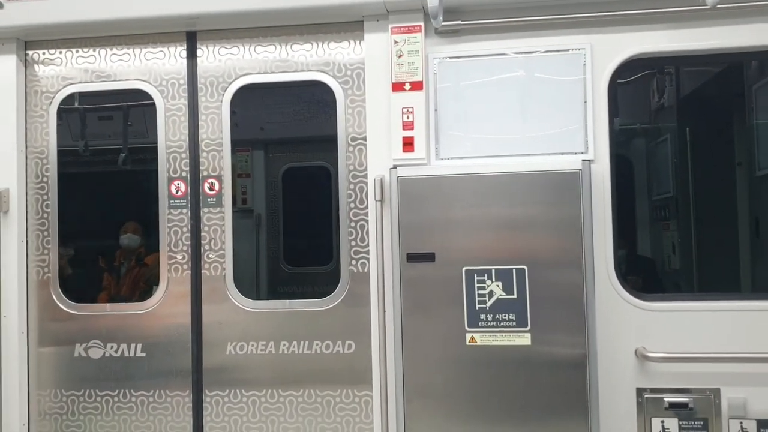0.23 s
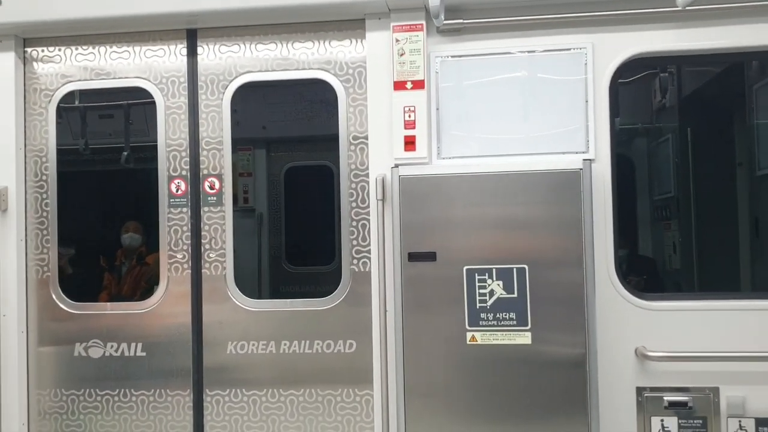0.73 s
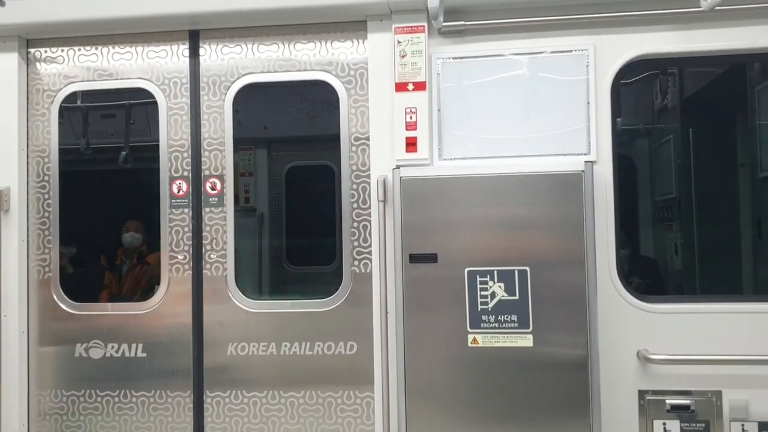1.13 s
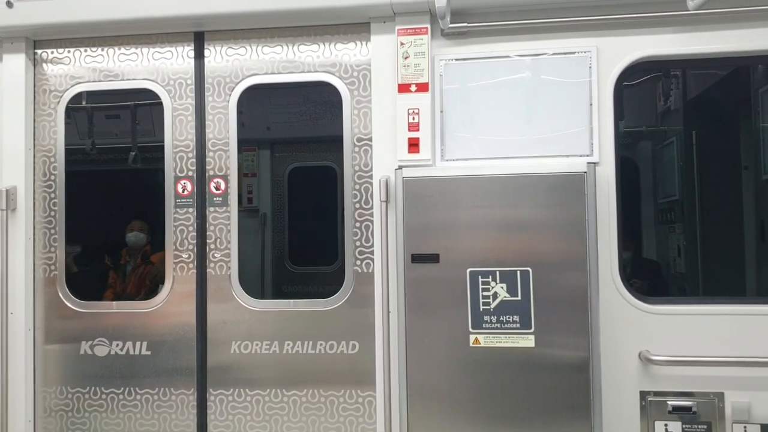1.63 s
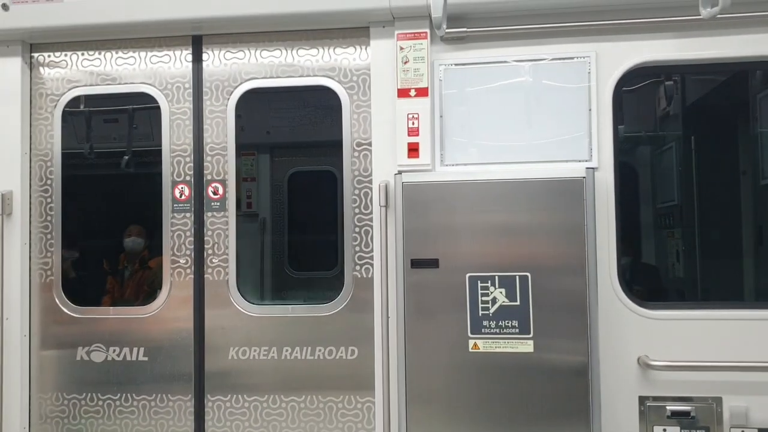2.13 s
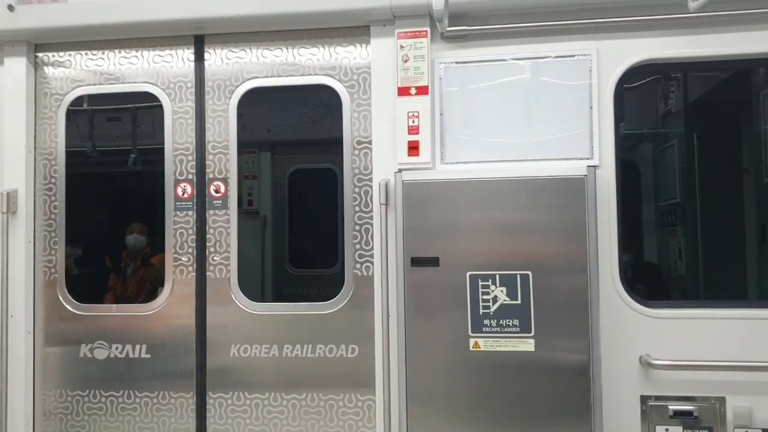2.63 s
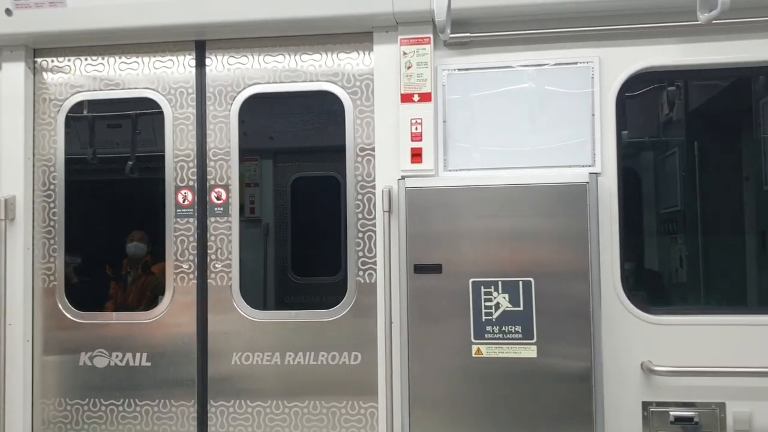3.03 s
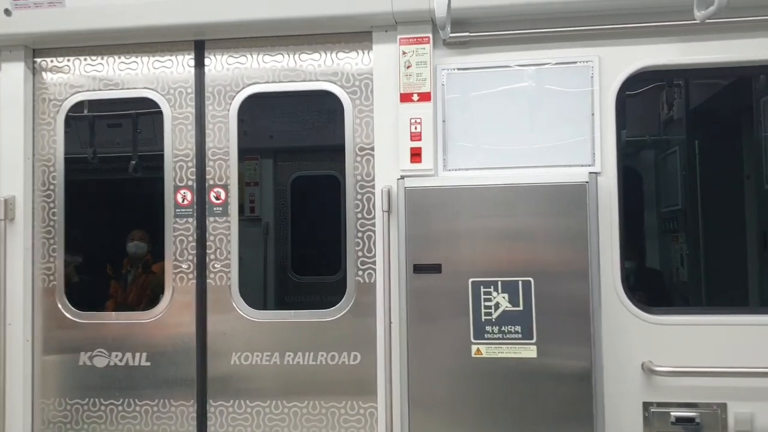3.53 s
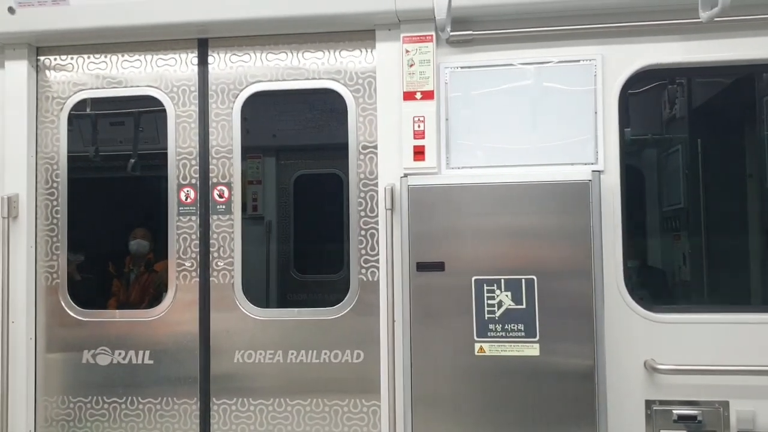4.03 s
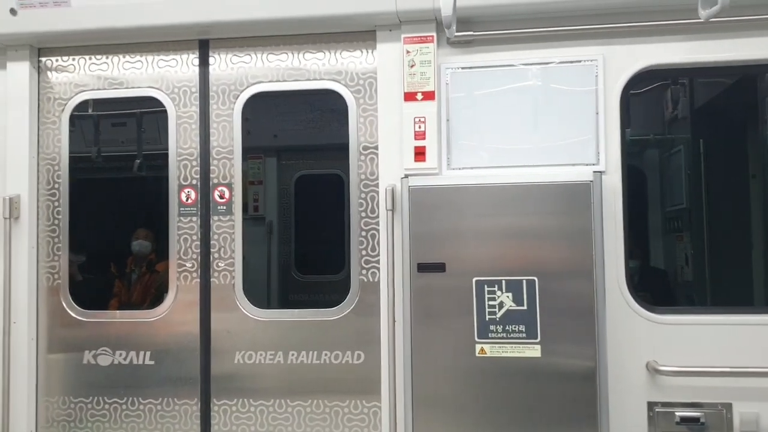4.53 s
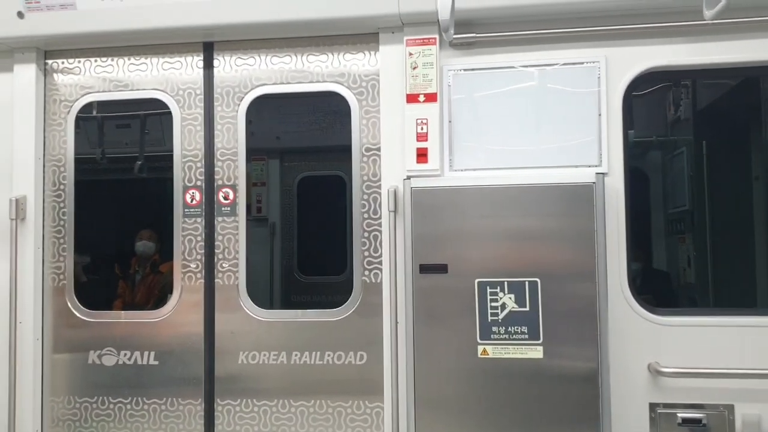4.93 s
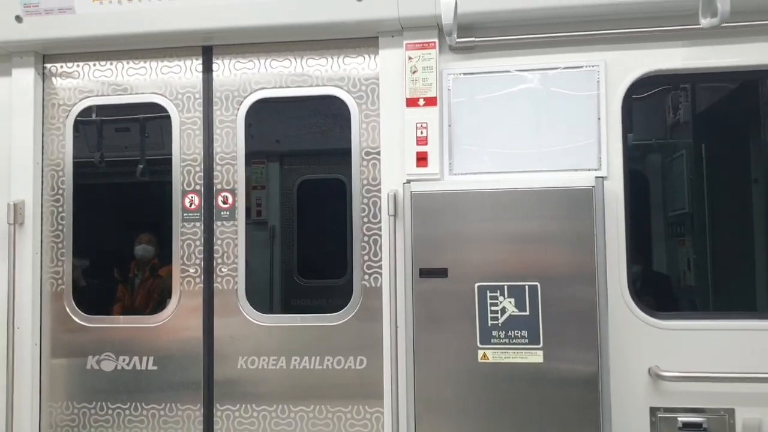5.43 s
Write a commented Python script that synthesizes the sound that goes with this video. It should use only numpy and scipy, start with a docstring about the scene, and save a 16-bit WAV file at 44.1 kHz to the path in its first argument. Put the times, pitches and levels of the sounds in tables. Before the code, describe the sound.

A train interior with bass-heavy rolling noise. Rail-joint knocks strike at the start, just before one second, after one and near one and a half, with small rattles, dry ticks and a tiny very high squeak. Afterwards mostly rumble, surging low booms and wavering rail howl, with breathy gusts of air. Close, enclosed space; small wide stereo microphone, treble softened, no people heard.

```python
"""Wheels roar on the rails at the end of an electric subway carriage running through a tunnel.
Shaped noise makes the roar, rumble, drone and howl; the body shell booms as a wandering low tone.
Rail joints knock under the floor with fading tones and noise bursts, and the trim ticks.
Hiss makes the air at the door seals; steady high tones make a squeaking fitting and faint inverter whines."""
import sys
import numpy as np
from scipy import signal
from scipy.fft import rfft, irfft, next_fast_len
from scipy.io import wavfile
from scipy.ndimage import uniform_filter1d

SR = 44100
rng = np.random.default_rng(int(sys.argv[2]) if len(sys.argv) > 2 else 0)


def master_out(mix):
    """Clip the mix to full scale and print it as 16-bit PCM to the path in sys.argv[1]."""
    frames = np.transpose(np.atleast_2d(mix))
    ceiling = np.clip(frames, -1, 1)
    pcm = np.round(ceiling * 32767).astype(np.int16)
    wavfile.write(sys.argv[1], SR, pcm)


N = 250488  # length in samples

# How loud the wheels are on the rails. Each row: time in seconds, roar off the tunnel wall in dB,
# drone of the rail in dB, rumble through the floor in dB.
ROLLING_LEVELS = [(0, -44, -39.5, -27.5), (.4, -43, -44.5, -26.5), (.53, -44, -39.5, -29),
                  (.7, -44.5, -43, -27), (.84, -43.5, -35.5, -29), (.95, -43.5, -42.5, -26),
                  (1.15, -41, -35.5, -27), (1.33, -45.5, -42, -30), (1.65, -44.5, -42, -27.5),
                  (1.9, -42.5, -39, -27), (2.1, -44, -46, -26), (2.42, -46.5, -46, -28.5),
                  (2.92, -41.5, -39.5, -25), (3.09, -40, -37.5, -28), (3.22, -43, -41.5, -27),
                  (3.4, -46, -43.5, -29.5), (3.72, -44, -40, -28), (3.89, -41.5, -37.5, -28),
                  (4.1, -45, -38.5, -28), (4.24, -40, -37.5, -26), (4.45, -47.5, -45, -29.5),
                  (4.75, -44.5, -40.5, -28), (4.88, -43, -36.5, -27), (5.02, -45, -42, -29),
                  (5.13, -44, -36.5, -28.5), (5.35, -46.5, -45, -28.5), (5.68, -42.5, -39.5, -30)]
# Tone colours of the three noises; cabin modes make the humps in the rumble.
# Each row: frequency in Hz, strength in dB per Hz.
ROAR_COLOUR = [(900, -21.5), (1300, -4), (1600, -1.5), (1800, -4), (2200, -1.5), (2800, -6), (3000, -13),
               (3900, -18.5), (4200, -19), (5000, -26), (7500, -29), (8600, -54), (11300, -36.5),
               (14700, -40.5)]
DRONE_COLOUR = [(450, -30), (560, -5), (700, -5), (820, -7), (1000, -13.5), (1400, -33)]
RUMBLE_COLOUR = [(25, -31), (38, -18.5), (48, -11), (65, 1), (85, -5), (105, -15.5), (180, -21.5),
                 (205, -13), (225, -10), (240, -12), (300, -13), (340, -9), (400, -14.5), (470, -11),
                 (575, -24), (700, -21.5), (900, -29.5), (1200, -48.5)]


def rolling():
    """Wheel and rail roughness shakes the tunnel air, the rail and the floor."""
    roar_db, drone_db, rumble_db = curves(ROLLING_LEVELS)
    roar = gain_of(roar_db) * noise(ROAR_COLOUR, patchy_db=1.0)
    drone = gain_of(drone_db) * noise(DRONE_COLOUR, patchy_db=1.0)
    rumble = gain_of(rumble_db) * noise(RUMBLE_COLOUR, patchy_db=0.2, size=4096)
    return roar + drone + rumble


# Loudness of the rail's upper band. Each row: time in seconds, level in dB.
HOWL_LEVELS = [(0.0, -45.5), (0.7, -46), (1.03, -46.5), (1.34, -49), (1.93, -46), (2.29, -49),
               (2.53, -46.5), (2.94, -41), (3.32, -51), (3.51, -44.5), (3.83, -42.5), (4.06, -41.5),
               (4.4, -46.5), (4.98, -44), (5.31, -48.5), (5.68, -45)]
# Its tone colour. Each row: frequency in Hz, strength in dB per Hz.
HOWL_COLOUR = [(750, -24.5), (900, -3.5), (1100, -3.5), (1400, -7.5), (1900, -29.5)]


def howl():
    """The upper band of the rail's drone swells on its own."""
    return gain_of(curves(HOWL_LEVELS)[0]) * noise(HOWL_COLOUR, patchy_db=1.0)


# Loudness of the deep thrum under the floor. Each row: time in seconds, level in dB.
THRUM_LEVELS = [(0, -29), (.2, -26.5), (.71, -25.5), (.87, -24), (.97, -30), (1.15, -27), (1.75, -30),
                (1.9, -29), (2.85, -28), (3.03, -23), (3.14, -28.5), (3.25, -23), (3.5, -30.5),
                (3.85, -26.5), (4.1, -30), (4.24, -27.5), (4.6, -28.5), (4.9, -26), (5.06, -27), (5.3, -27),
                (5.68, -31)]
# Its tone colour. Each row: frequency in Hz, strength in dB per Hz.
THRUM_COLOUR = [(85, -10), (105, -4.5), (115, -4.5), (125, 0), (143, -3.5), (160, -1.5), (185, -4),
                (210, -16.5)]


def thrum():
    """The deep resonances of the cabin come and go with the track."""
    return gain_of(curves(THRUM_LEVELS)[0]) * noise(THRUM_COLOUR, patchy_db=-0.25, size=4096)


# Jolts of the body shell, each one swell.
# Each row: start in seconds, length in seconds, level in dB, pitch in Hz.
SHELL_JOLTS = [(0.043, 0.13, -20, 54), (0.215, 0.092, -20, 59.2), (0.291, 0.059, -23, 55.7),
               (0.37, 0.092, -23, 56.3), (0.477, 0.07, -19, 58.6), (0.601, 0.063, -23, 57.4),
               (0.715, 0.12, -24.5, 54.5), (.84, .1, -23, 52.8), (0.92, .21, -19.5, 52.6),
               (1.208, 0.32, -23.5, 57.3), (1.543, 0.11, -23.5, 62.5), (1.639, 0.14, -21, 51.4),
               (1.97, 0.11, -22, 58.2), (2.098, .1, -32.5, 63), (2.779, 0.11, -23.5, 56),
               (2.99, .12, -18.5, 51.8), (3.08, .13, -17.5, 50.6), (3.204, 0.1, -19, 53.3),
               (3.273, 0.18, -19, 52.9), (3.42, .1, -24, 54.3), (3.799, 0.27, -29.5, 58.2),
               (4.113, 0.16, -15, 52.8), (4.238, 0.12, -18.5, 50.7), (4.368, 0.13, -26, 53.5),
               (4.92, 0.13, -23, 55.3)]
# Loudness of the shell's murmur. Each row: time in seconds, level in dB.
MURMUR_LEVELS = [(0, -29.5), (1.2, -34), (2.3, -28), (2.9, -30.5), (3.7, -33), (4.7, -44.5), (5.3, -33),
                 (5.68, -41.5)]
JOLT_RISE, JOLT_FALL = 0.37, 0.36  # shares of the jolt's length
JOLT_ROUGH_DB = 0.9  # a swell never holds still
MURMUR_HZ, MURMUR_WIDTH_HZ = 53.5, 7.62  # the mode wanders by chance between jolts


def boom():
    """The shell's lowest mode murmurs; each jolt takes it over in one swell, the same in both ports."""
    swells = np.array([swell(s, length, JOLT_RISE, JOLT_FALL) for s, length, db, hz in SHELL_JOLTS])
    _, _, db, hz = np.transpose(SHELL_JOLTS)
    power = (gain_of(db)[:, None] * swells) ** 2
    level = np.sqrt(power.sum(axis=0))
    # the strongest jolt pulls the pitch most; with no jolt the tiny term leads back to the murmur
    pitch = (hz @ power + MURMUR_HZ * 1e-9) / (level ** 2 + 1e-9)
    jolts = level * np.sqrt(2) * np.sin(2 * np.pi * np.cumsum(pitch) / SR)
    jolts = jolts * uneven(JOLT_ROUGH_DB, size=2000)
    murmur = gain_of(curves(MURMUR_LEVELS)[0]) * wavering(MURMUR_HZ, MURMUR_WIDTH_HZ)[0]
    return jolts + (1 - swells.max(axis=0)) * murmur


# Blows at the rail joints. Each row: start in seconds, ring of the floor in dB, ring of the wheel in dB,
# clack in dB, bite in dB, rattle of loose trim in dB,
# time in seconds for clack, bite and rattle to fade by 60 dB.
JOINT_KNOCKS = [(0.033, -36, -50, -53, -57, -75, .2), (0.2118, -18, -17.5, -28, -38.5, -76, 0.21),
                (0.2314, -25, -31, -41, -43, -79, 0.25), (.476, -45, -50, -48, -52, -67, .17),
                (0.506, -57, -48, -38, -47, -58, 0.22), (0.786, -32.5, -26, -35, -52, -74, 0.2),
                (.805, -36, -32, -37, -44, -56, 0.33), (.818, -48, -30, -34, -47, -58, .15),
                (0.831, -45, -30, -38, -46, -54, 0.27), (0.842, -22, -32, -41, -48, -62, .2),
                (0.864, -33, -33, -47, -54, -68, .15), (1.181, -26.5, -27, -34, -36.5, -42.5, 0.34),
                (1.186, -40, -28.5, -40, -36, -58, 0.15), (1.198, -32, -33, -36, -50, -68, 0.47),
                (1.219, -29, -37, -45, -46, -60, 0.22), (1.24, -48, -41, -46, -48, -62, .2),
                (1.315, -47, -50, -55, -56, -50.5, 0.31), (1.318, -52, -48, -52, -42, -55, 0.15),
                (1.5455, -34, -21.5, -27.5, -42, -70, 0.18), (1.554, -26, -21, -33, -42, -69, 0.17),
                (1.569, -30, -33, -39, -49, -74, 0.27), (1.765, -37, -38, -47, -48, -63, .1),
                (2.69, -45, -34, -48, -48, -67, 0.11), (3.758, -48, -39, -50, -59, -75, 0.18),
                (3.855, -44, -40, -39, -52, -79, 0.11), (3.997, -26.5, -53, -34, -63, -77, .15),
                (5.565, -40, -42, -51, -49, -66, .09)]
# Rise times in seconds of clack, bite and rattle, one a row: the treble arrives first.
KNOCK_RISE_S = [
    [0.0082],
    [0.0069],
    [0.0015],
]
# Tone colours of the three noises. Each row: frequency in Hz, strength in dB per Hz.
CLACK_COLOUR = [(700, -17), (1000, 2.5), (1450, 4), (1900, -2), (2500, -3), (3000, -3.5), (3400, -20)]
BITE_COLOUR = [(2400, -16), (3000, 3.5), (3600, -0.5), (4300, 1), (4900, -10.5), (7500, -15.5), (8300, -47)]
RATTLE_COLOUR = [(3500, -10), (5000, 5), (7500, 0), (9000, -5.5), (12000, -5), (14700, -11)]
# Modes (natural tones) of the floor and of the wheel, whose low ones swell late.
# Each row: frequency in Hz, strength in dB, time in seconds to fade by 60 dB, rise time in seconds.
FLOOR_MODES = [(366, 0.5, 0.13, 0.002), (414, 5.5, 0.05, 0.0017), (500, 5, 0.053, 0.0031),
               (664, 2.5, 0.036, 0.0022), (1127, -27.5, 0.041, 0.0046)]
WHEEL_MODES = [(1366, -18.5, 0.058, 0.023), (1576, -5.5, 0.066, 0.0097), (1814, -13.5, 0.057, 0.0097),
               (2100, -11, 0.031, 0.0038), (2446, -8, .045, .004), (2810, -3.5, 0.018, 0.0024),
               (3072, -14, 0.021, 0.0026), (3720, -20, 0.025, .003), (4280, -25, 0.032, 0.0054),
               (4400, -24.5, .03, .003)]
CHATTER_DB = 1.6  # parts strike unevenly


def knocks():
    """Each joint rings floor and wheel in fading tones, clacks and shakes the trim in noise bursts."""
    colours = (CLACK_COLOUR, BITE_COLOUR, RATTLE_COLOUR)
    noises = [noise(colour, patchy_db=0.5, size=512) for colour in colours]
    chatter = uneven(CHATTER_DB, size=60)
    t = np.arange(N) / SR
    power, rings = np.zeros((3, N)), np.zeros(N)
    for s, floor_db, wheel_db, clack_db, bite_db, rattle_db, t60 in JOINT_KNOCKS:
        age = np.maximum(t - s, 0)
        shape = (1 - np.exp(-age / KNOCK_RISE_S)) * gain_of(-60 * age / t60)
        # the direct sound leads, most in the rattle
        snap = 1 + np.array([[.3], [.2], [.8]]) * np.exp(-age / 0.0044)
        power += (gain_of([[clack_db], [bite_db], [rattle_db]]) * shape * snap) ** 2
        floor_ring = gain_of(floor_db) * ringing(FLOOR_MODES)
        wheel_ring = gain_of(wheel_db) * ringing(WHEEL_MODES)
        add(rings, s, floor_ring + wheel_ring)
    bursts = sum(np.sqrt(p) * part for p, part in zip(power, noises))
    return rings + chatter * bursts


# Thin ticks of the trim. Each row: start in seconds, level in dB.
TRIM_TICKS = [(1.180, -56), (1.313, -47), (2.902, -51)]
# Their tone colour. Each row: frequency in Hz, strength in dB per Hz.
TICK_COLOUR = [(5000, -22), (8000, -10), (11000, -1), (13000, 0), (14700, -2)]
TICK_T60_S = 0.033  # seconds to fade by 60 dB


def ticks():
    """The trim gives a few dry, very high ticks: noise that starts at once and fades fast."""
    t = np.arange(N) / SR
    level = sum((t >= s) * gain_of(db - 60 * np.maximum(t - s, 0) / TICK_T60_S) for s, db in TRIM_TICKS)
    return level * noise(TICK_COLOUR, patchy_db=0, size=512)


# Gusts at the door seals. Each row: start in seconds, length in seconds, level in dB.
SEAL_GUSTS = [(0.01, 0.17, -83), (0.31, 0.48, -54.5), (.76, 0.23, -48), (1.093, 0.27, -57),
              (1.398, 0.22, -59), (2.348, 0.49, -64), (2.814, 0.29, -51), (2.966, 0.29, -49),
              (3.165, 0.24, -59.5), (4.074, 0.35, -50.5), (4.898, 0.17, -67)]
# The leak that goes on beneath the gusts. Each row: time in seconds, level in dB.
LEAK_LEVELS = [(0, -62.5), (1.0, -58.5), (1.7, -70), (2.1, -65.5), (2.7, -66), (3.62, -61), (3.75, -71),
               (4.0, -62), (4.8, -71), (5.68, -65)]
# Tone colour of the hiss. Each row: frequency in Hz, strength in dB per Hz.
RUSH_COLOUR = [(2000, -6), (3000, -1), (4500, -5), (6000, -12), (7500, -9), (8800, -23), (10000, -13),
               (11500, -11), (12800, -20), (14700, -26)]
GUST_RISE, GUST_FALL = 0.25, 0.67  # shares of the gust's length
FLUTTER_DB = 1.1  # the seals flutter and coarsen the hiss


def rush():
    """Tunnel air hisses through the fluttering door seals, as a leak with gusts."""
    gusts = sum((gain_of(db) * swell(s, length, GUST_RISE, GUST_FALL)) ** 2 for s, length, db in SEAL_GUSTS)
    leak = gain_of(curves(LEAK_LEVELS)[0]) ** 2
    level = np.sqrt(gusts + leak) * uneven(FLUTTER_DB, size=300)
    return level * noise(RUSH_COLOUR, patchy_db=3.0, size=512)


# Rubs of the fitting. Each row: start in seconds, length in seconds, level in the right port in dB.
FITTING_SQUEAKS = [(.035, 0.065, -63), (0.62, 0.073, -53.5), (1.315, 0.052, -42.5), (1.43, 0.055, -62)]
SQUEAK_HZ, SQUEAK_WIDTH_HZ = 10395, 9.1
SQUEAK_RISE, SQUEAK_FALL = 0.17, 0.35  # shares of the squeak's length
SQUEAK_T60_S = 0.22  # tail in the carriage: seconds to fade by 60 dB
SQUEAK_LEFT_DB = -4  # left port against right


def squeaks():
    """A rubbing fitting sings on one high pitch for a moment, a little to the right."""
    rub = sum(gain_of(db) * swell(s, length, SQUEAK_RISE, SQUEAK_FALL) for s, length, db in FITTING_SQUEAKS)
    keep = gain_of(-60 / (SQUEAK_T60_S * SR))  # share kept from one sample to the next
    tail = signal.lfilter([1 - keep], [1, -keep], rub)
    level = np.maximum(rub, tail)
    return level * wavering(SQUEAK_HZ, SQUEAK_WIDTH_HZ) * gain_of([[SQUEAK_LEFT_DB], [0]])


# Pitches of the whines in Hz.
WHINE_HZ = [4135, 6501, 7499, 13001]
# One row for each pitch. Each row: level in dB, width of the line in Hz.
WHINE_LINES = [(-78, 26), (-79.5, 5.4), (-79.5, 16), (-84, 3.3)]
WHINE_FLICKER_DB = 2


def inverter():
    """The traction gear gives thin, steady-pitched whines that come and go in strength."""
    return sum(gain_of(db) * wavering(hz, width_hz) * uneven(WHINE_FLICKER_DB, size=4000)
               for hz, (db, width_hz) in zip(WHINE_HZ, WHINE_LINES))


def gain_of(db):
    """Turn decibels into a factor."""
    return 10 ** (np.asarray(db) / 20)


def evened(x):
    """Scale to an average (RMS) strength of 1."""
    return x / np.sqrt(np.mean(x ** 2) + 1e-20)


def read(points, hz):
    """Read a table between its points, along a logarithmic frequency scale."""
    f, value = np.transpose(points)
    return np.interp(np.log(hz + 1), np.log(f + 1), value)


def curves(rows):
    """Every column after the time, sample by sample."""
    s, *columns = np.transpose(rows)
    return [np.interp(np.arange(N) / SR, s, c) for c in columns]


def swell(start, length, rise, fall):
    """A smooth rise, a hold and a smooth fall."""
    u = (np.arange(N) / SR - start) / length
    return np.sin(np.pi / 2 * np.clip(np.minimum(u / rise, (1 - u) / fall), 0, 1)) ** 2


def uneven(depth_db, size):
    """A gain that wanders by chance over `size` samples or so."""
    return gain_of(depth_db * evened(uniform_filter1d(rng.standard_normal(N), size=size)))


# How alike the two ports hear the noises.
# Each row: frequency in Hz, likeness from -1 (opposite) to 1 (the same).
PORT_LIKENESS = [(60, 0.83), (120, 0.99), (240, 0.79), (470, 0.7), (920, -0.14), (1830, 0.056),
                 (3620, 0.019), (7170, -0.09), (14200, -0.04)]


def noise(colour, patchy_db, size=1024):
    """Two-port noise of a given colour, with patches that drift in time and pitch."""
    hz = np.fft.rfftfreq(size, 1 / SR)
    a, b, c, d, patches = rng.standard_normal((4 * N // size + 5, len(hz), 5)).T
    patches = uniform_filter1d(patches, size=12, axis=0)
    patches = evened(uniform_filter1d(patches, size=12, axis=1))
    same = np.clip(read(PORT_LIKENESS, hz), -1, 1)[:, None]
    left, other = a + 1j * b, c + 1j * d
    right = same * left + np.sqrt(1 - same ** 2) * other
    inside = (hz >= colour[0][0]) & (hz <= colour[-1][0])  # silent outside the table
    strength = gain_of(read(colour, hz)[:, None] + patchy_db * patches) * inside[:, None]
    spectra = np.array([left, right]) * strength
    return evened(signal.istft(spectra, nperseg=size, noverlap=3 * size // 4)[1][:, :N])


def wavering(hz, width_hz):
    """A tone whose phase drifts by chance in each port, which widens its line."""
    drift = np.sqrt(2 * np.pi * abs(width_hz) / SR) * np.cumsum(rng.standard_normal((2, N)), axis=1)
    phase = 2 * np.pi * np.cumsum(hz * np.ones(N)) / SR
    return np.sqrt(2) * np.sin(phase + uniform_filter1d(drift, size=200))


RING_SPREAD = .03  # each blow meets another spot and shifts the modes by up to this share


def ringing(modes):
    """One blow on a set of modes, each shifted a little by chance."""
    age = np.arange(8192) / SR
    shift = 1 + RING_SPREAD * rng.uniform(-0.95, 1, len(modes))
    return sum((1 - np.exp(-age / rise_s)) * gain_of(db - 60 * age / t60) * np.sin(2 * np.pi * hz * k * age)
               for (hz, db, t60, rise_s), k in zip(modes, shift))


def add(mix, s, sound):
    """Lay a sound into the mix at s seconds."""
    part = mix[round(s * SR):][:len(sound)]
    part += sound[:len(part)]


def scene():
    """All sources together."""
    wheels = rolling() + howl() + thrum()
    body = boom() + knocks() + ticks()
    return wheels + body + rush() + squeaks() + inverter()


# Tone balance of the two microphone ports. Each row: frequency in Hz, left minus right in dB.
PORT_BALANCE = [(60, -4), (99, -3.5), (160, -0.5), (270, -4), (440, -2.5), (720, -2), (1180, -5),
                (1950, -7.5), (3200, -10), (5260, -1), (8640, 0), (14200, -0.5)]
MIC_LOW_HZ, EDGE_HZ = 38.7, 14600  # the bass fades below the first, the treble stops at the second


def record(dry):
    """The two ports colour the sound differently and lose the deepest bass; then the band limit."""
    size = next_fast_len(N + 4096)
    hz = np.fft.rfftfreq(size, 1 / SR)
    lean_db = read(PORT_BALANCE, hz) / 2
    bass_cut = 1 / np.sqrt(1 + (MIC_LOW_HZ / (hz + 1)) ** 6)
    ports = irfft(rfft(dry, size) * gain_of([lean_db, -lean_db]) * bass_cut, size)[:, :N]
    treble_limit = signal.firwin(1023, EDGE_HZ, window=("kaiser", 9), fs=SR)
    return signal.oaconvolve(ports, treble_limit[None], "same")


dry = scene()
out = record(dry)
master_out(out)
```